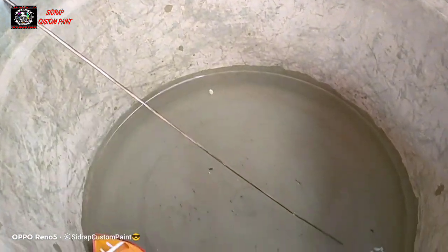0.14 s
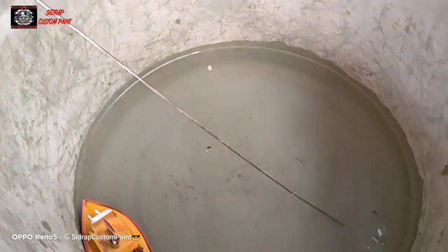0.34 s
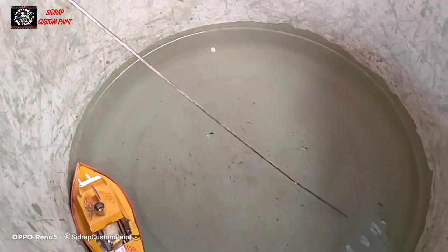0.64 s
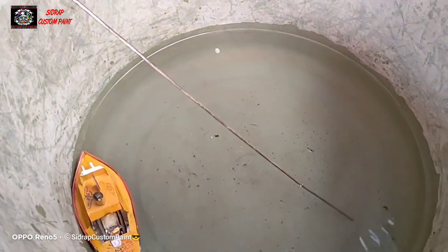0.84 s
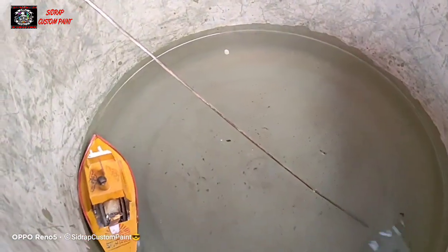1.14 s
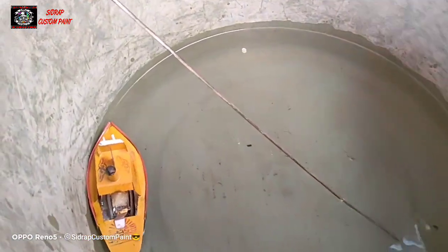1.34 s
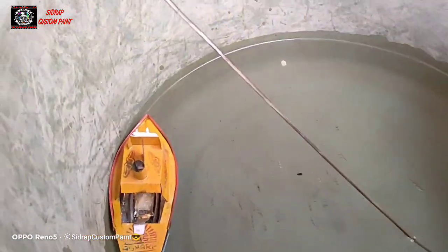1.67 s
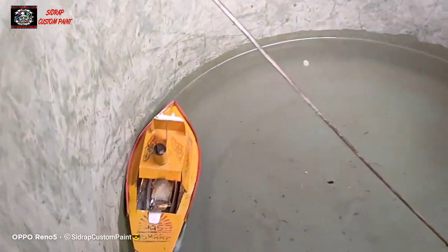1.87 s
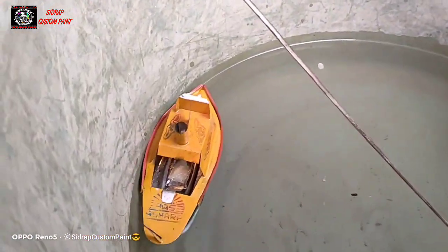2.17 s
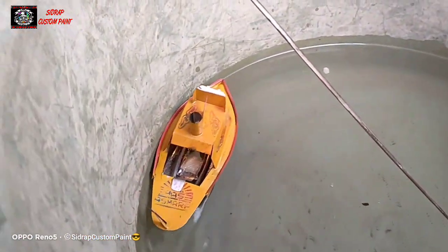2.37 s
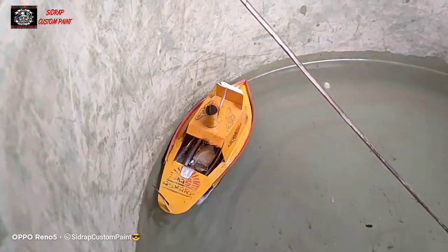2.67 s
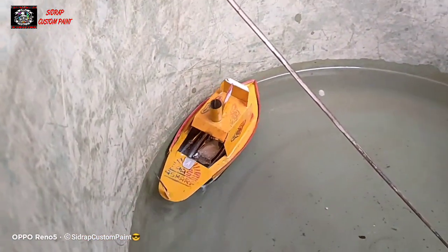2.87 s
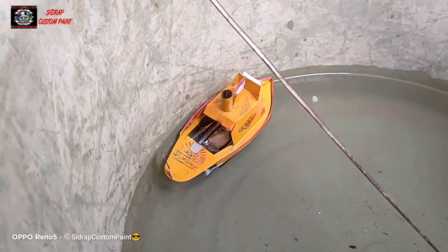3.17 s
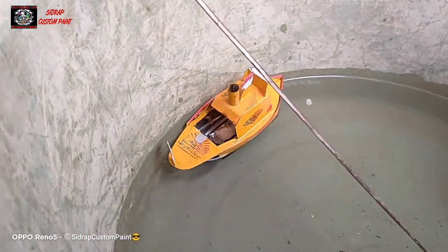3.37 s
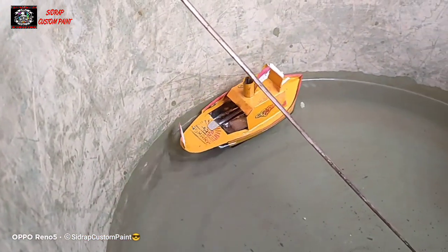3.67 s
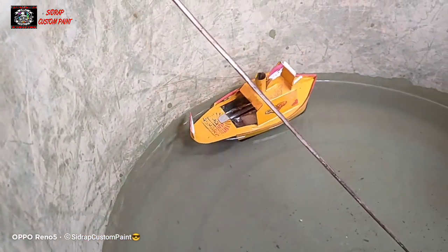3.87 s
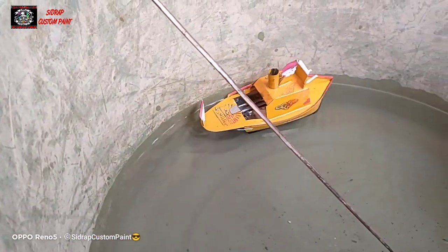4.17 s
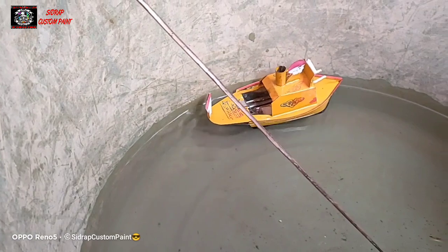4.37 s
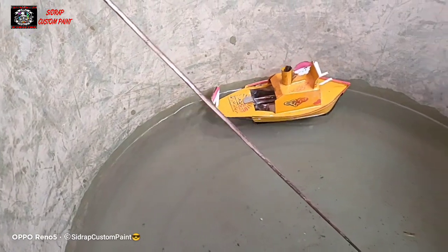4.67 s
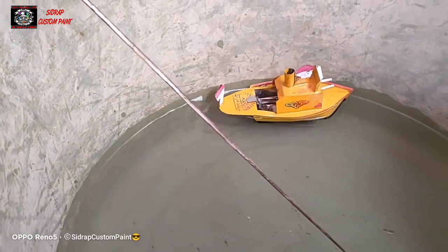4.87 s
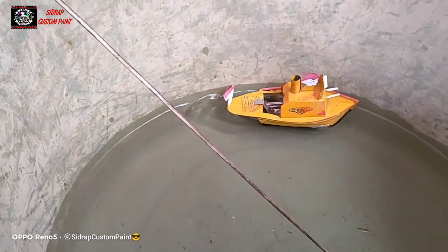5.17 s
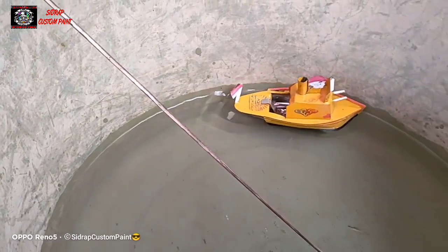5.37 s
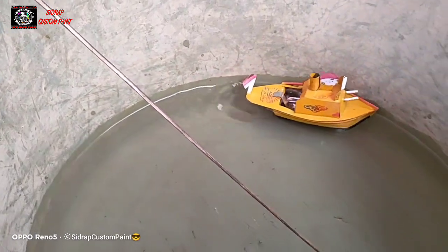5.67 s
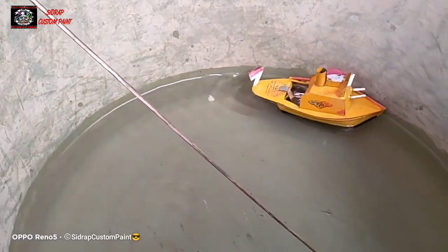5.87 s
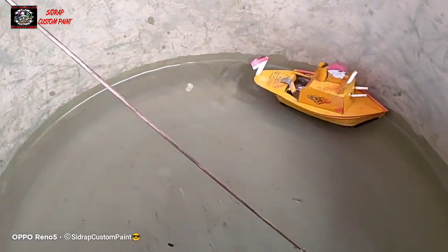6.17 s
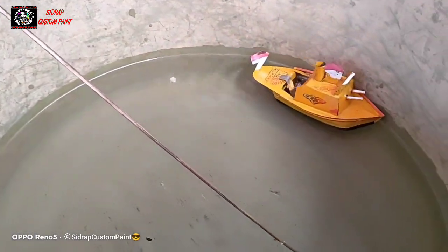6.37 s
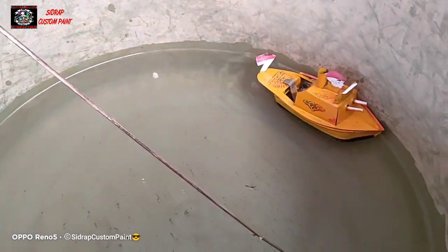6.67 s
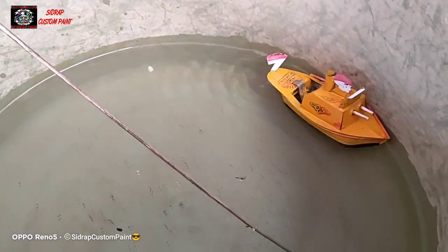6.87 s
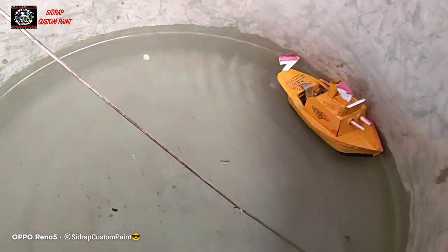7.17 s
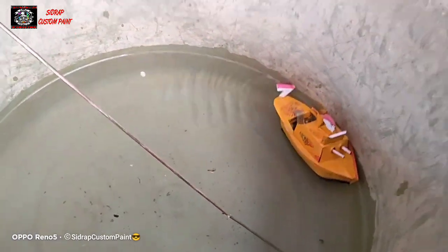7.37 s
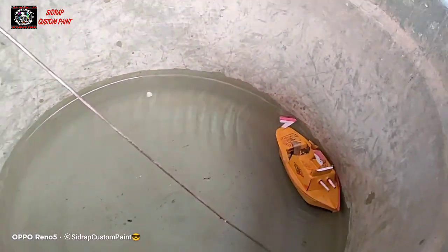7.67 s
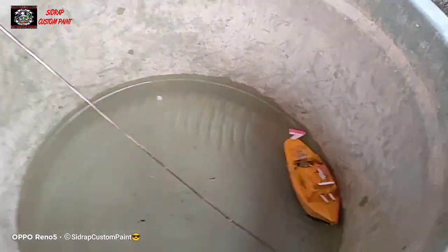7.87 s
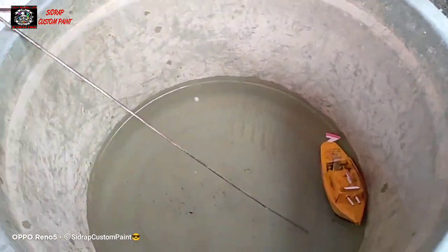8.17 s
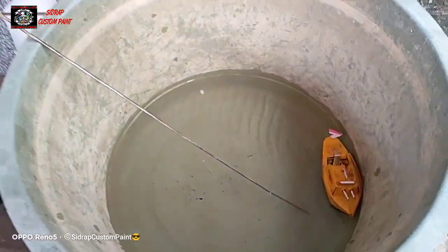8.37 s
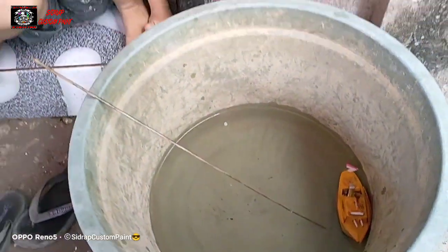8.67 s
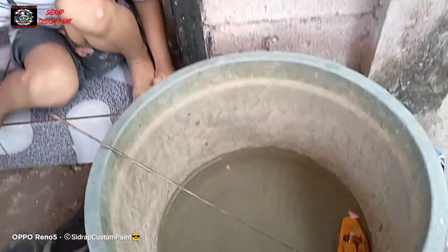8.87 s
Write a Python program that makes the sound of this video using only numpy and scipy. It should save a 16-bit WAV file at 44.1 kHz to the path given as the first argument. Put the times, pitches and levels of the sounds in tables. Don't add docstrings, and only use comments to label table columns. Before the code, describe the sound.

A small tin steam toy boat putters rapidly in a plastic tub, spaced metallic pops tightening into a quick, even clatter, close up outdoors.

```python
import sys
import numpy as np
from scipy import signal
from scipy.fft import rfft, irfft, next_fast_len
from scipy.io import wavfile
from scipy.ndimage import uniform_filter1d, minimum_filter1d, map_coordinates

SR = 44100
rng = np.random.default_rng(int(sys.argv[2]) if len(sys.argv) > 2 else 0)


def bounce(signal):
    frames = np.transpose(np.atleast_2d(signal))
    limited = np.clip(frames, -1, 1)
    pcm = np.round(limited * 32767).astype(np.int16)
    wavfile.write(sys.argv[1], SR, pcm)


def linear_from_db(decibels):
    return 10 ** (np.asarray(decibels, float) / 20)


N = 398523
RING = SR // 16


def unit(x):
    return x / np.sqrt(np.mean(x ** 2) + 1e-20)


def along(points, hz):
    f, v = np.transpose(points)
    return np.interp(np.log(hz + 1), np.log(f + 1), v)


def curves(rows, s=None, outside=None):
    at, *cols = np.transpose(rows)
    s = np.arange(N) / SR if s is None else s
    return [np.interp(s, at, c, outside, outside) for c in cols]


def drift(rate, s, count):
    knots = rng.standard_normal((count, int(N * rate / SR) + 4))
    return np.array([map_coordinates(k, [s * rate + 1]) for k in knots])


def noise(gain, alike, patchy_db=0):
    z = signal.stft(rng.standard_normal((2, N)), nperseg=512)[2]
    field = uniform_filter1d(rng.standard_normal(z.shape[1:]), size=6, axis=0)
    field = uniform_filter1d(field, size=12, axis=1)
    pair = signal.istft(z * linear_from_db(patchy_db * unit(field)), nperseg=512)[1][:, :N]
    m = next_fast_len(N + 8192)
    a, b = irfft(rfft(pair, m) * gain(np.fft.rfftfreq(m, 1 / SR)), m)[:, :N]
    turn = np.arccos(np.clip(alike, -1, 1)) / 2
    middle, difference = np.cos(turn) * a, np.sin(turn) * b
    return unit(np.array([middle + difference, middle - difference]))


def resonance(hz, centre_hz, width_hz):
    return np.abs(hz * width_hz / (centre_hz ** 2 - hz ** 2 + 1j * hz * width_hz))


def ring(modes, t, shift, level_db, phase, attack, damping):
    hz, db, t60 = (c[:, None] for c in np.transpose(modes))
    t = np.maximum(t, 0)
    fade = linear_from_db(db + level_db[..., None] - 60 * damping * t[:, None] / t60)
    waves = (fade * np.sin(2 * np.pi * hz * shift * t[:, None] + phase[..., None])).sum(1)
    return waves * (1 - np.exp(-(t / attack) ** 2)) * (1 + 0.49 * np.exp(-t / 0.0052))


# time in seconds, wind level in dB, air level in dB.
STREET_LEVELS = [
    (0.0, -68, -47),
    (0.88, -65, -53),
    (3.14, -54, -55),
    (3.82, -64, -57),
    (7.53, -69, -56.5),
    (9.04, -66, -51),
]
# time in seconds, firing rate in Hz, low orders in dB, upper orders in dB.
ENGINE_HUM = [(0, 30.05, -73, -77), (.4, 30.78, -69, -68), (1.5, 31.98, -60, -70.5),
              (1.9, 32.24, -52.5, -65.5), (2.4, 32.9, -54, -69), (2.8, 33.45, -60, -66),
              (3.1, 33.68, -50, -65), (3.4, 33.87, -53, -67.5), (3.6, 33.95, -62, -69),
              (4.6, 34.1, -70, -71.5), (5.2, 33.55, -67, -71), (5.6, 30.96, -80, -77.5)]
# multiple of the firing rate, level in dB.
ENGINE_ORDERS = [(4, 1), (5, 2), (6, -7), (7, -8), (8, -9)]
# frequency in Hz, level in dB per Hz.
WIND_SPECTRUM = [(15, -4), (33, 10), (55, 9), (120, 0.5), (250, -53)]
# frequency in Hz, level in dB per Hz.
AIR_SPECTRUM = [(35, -33), (60, -8.5), (176, -3), (593, -7), (666, -9.5), (1470, -12), (2470, -3.5),
                (2840, -7.5), (4750, -10.5), (5210, -10.5), (7570, -21.5), (13900, -27), (16000, -35)]


def street():
    wind_db, air_db = curves(STREET_LEVELS)
    firing_hz = curves(ENGINE_HUM)[0]
    _, low_db, upper_db = curves(list(ENGINE_HUM) + [(8.7, 0, -100, -100)])
    turn = 2 * np.pi * np.cumsum(firing_hz) / SR
    sway = drift(5, np.arange(N) / SR, count=len(ENGINE_ORDERS) + 2)
    low = np.sin(2 * turn + 1.1 * sway[0]) + 0.71 * np.sin(turn + 0.38 * sway[1])
    hum = linear_from_db(low_db + 4.5) * low
    for (multiple, db), w in zip(ENGINE_ORDERS, sway[2:]):
        hum += linear_from_db(upper_db + 10 + db + 2 * w) * np.sin(multiple * turn + 1.05 * w)
    wind = noise(lambda hz: linear_from_db(along(WIND_SPECTRUM, hz)), alike=0.9)
    air = noise(lambda hz: linear_from_db(along(AIR_SPECTRUM, hz)), alike=0.49, patchy_db=3.5)
    return linear_from_db(wind_db + 3.5) * wind + hum * linear_from_db([[-1], [1]]) + linear_from_db(air_db + 5.5) * air


# start in seconds, length in seconds, centre in Hz, bandwidth in Hz, level in dB.
FAINT_EVENTS = [
    (0.064, 0.039, 5200, 200, -43),
    (1.544, 0.098, 6800, 800, -31.5),
    (1.915, 0.071, 5550, 1490, -26.5),
    (2.327, 0.35, 145, 61, -45.5),
    (6.938, 0.095, 6200, 600, -44),
    (4.488, 0.015, 910, 120, -35.5),
]


def faint():
    t, out = np.arange(N) / SR, 0
    for s, length, hz, width, db in FAINT_EVENTS:
        swell = np.sin(np.pi * np.clip((t - s) / length, 0, 1) ** 0.28)
        out = out + linear_from_db(db) * swell * noise(lambda f: resonance(f, hz, width) ** 2, alike=0.94)
    return out


# time in seconds, level in dB.
SHUFFLE_LEVEL = [
    (8.958, -36),
    (8.968, -20),
    (9.0, -21),
    (9.02, -25.5),
    (9.04, -34),
]
# frequency in Hz, level in dB per Hz.
CLOTH_SPECTRUM = [(120, -59), (200, -39), (569, -30), (1080, -6.5), (1480, -11), (2090, -7), (2860, -19),
                  (4430, -8), (9750, -34.5), (14600, -41), (16000, -61)]


def shuffle():
    level_db, = curves(SHUFFLE_LEVEL, outside=-120)
    lumps = linear_from_db(1.9 * drift(180, np.arange(N) / SR, count=1))
    rub = noise(lambda hz: linear_from_db(along(CLOTH_SPECTRUM, hz)), alike=0.37, patchy_db=3.5)
    return linear_from_db(level_db) * lumps * rub


# time in seconds, level in dB, squeak frequency in Hz.
SCRAPE_PATH = [
    (4.265, -45, 5730),
    (4.29, -36, 5700),
    (4.32, -33, 6060),
    (4.335, -34, 6680),
    (4.355, -40, 6800),
    (4.37, -41, 6950),
]
# frequency in Hz, level in dB per Hz.
WIRE_SPECTRUM = [(1180, -56), (2000, -26), (2320, -28), (2890, -11), (5140, -14), (5760, -5), (8520, -35),
                 (11700, -28), (14000, -48)]


def scrape():
    level_db, _ = curves(SCRAPE_PATH, outside=-120)
    squeak_hz = curves(SCRAPE_PATH)[1]
    t = np.arange(N) / SR
    grit = noise(lambda hz: linear_from_db(along(WIRE_SPECTRUM, hz)), alike=0.14, patchy_db=-2.5)
    shake = drift(150, t, count=3)
    squeal = 0.5 * np.sin(2 * np.pi * 2900 * t + 1.9 * shake[0])
    octave = 0.3 * np.sin(2 * np.pi * 5780 * t + .9 * shake[1])
    squeak = 0.61 * np.sin(2 * np.pi * np.cumsum(squeak_hz) / SR + 0.86 * shake[2])
    return linear_from_db(level_db + 3.0) * (grit + squeal + octave + squeak)


# frequency in Hz, decay time t60 in seconds.
PORCH_DECAY = [(400, 0.25), (1500, 0.32), (4500, 0.34), (9000, 0.42), (15000, 0.068)]


def porch(x):
    out, step = np.zeros((2, N + SR)), SR // 5
    for start in range(0, N, step):
        hz, t, z = signal.stft(rng.standard_normal((2, SR // 3)), SR, nperseg=256)
        decay = linear_from_db(-60 * t / along(PORCH_DECAY, hz)[:, None])
        tail = signal.istft(z * decay, SR, nperseg=256)[1]
        wet = signal.fftconvolve(x[:, start:start + step], tail / np.linalg.norm(tail[0]), axes=1)
        out[:, start + 200:][:, :wet.shape[1]] += wet
    return out[:, :N]


# first snap in seconds, snap level in dB, tin ring
# in dB, letters (one a steam cycle: x snaps; e, t, l tick early, on time, late; . stays silent).
RHYTHM_BARS = [(0.2577, -4, -1, "xe..xl.xt.."), (0.9335, -7, 3.5, "xl..xt."), (1.3617, -10.5, 5, "xt.xl.."),
               (1.7887, -6, 3, "xl"), (1.914, -7, 1.5, "xtxt"), (2.1573, -8, 3, "xxlxexl"),
               (2.588, -5, -3.5, "xx.."), (2.8312, -4, -4, "xext."), (3.1365, -3.5, -2.5, "xtxtxx."),
               (3.567, -7, -1.5, "xexx."), (3.8745, -6.5, -3.5, "xexx.xx."),
               (4.3636, -8.5, -2, "xx.xlxxl."), (4.9149, -6.5, -2, "xx.xe"), (5.2214, -3, -4, "xt"),
               (5.3462, -3.2, -4.5, "xexl"), (5.59, -7, -3, "xxxlxe"), (5.9609, -8.5, -1.8, "xxxx."),
               (6.2705, -3.5, -3.5, "xxxx."), (6.5778, -9, -3.5, "xx."), (6.7633, -10.5, -1.5, "xxxl"),
               (7.0109, -10, -0.5, "xx."), (7.2016, -9.5, -0.6, "xexlxe"), (7.5718, -7.5, -1.5, "xtxtxt"),
               (7.9465, -8.5, 1.2, "xlxl"), (8.1959, -7.5, -0.5, "xx."), (8.386, -8.5, 0.3, "xlxlxt"),
               (8.7549, -4, -1, "xtx.")]
# time in seconds, rattle in dB under the snap.
RATTLE_LEVEL = [(0.3, -6), (1.5, -3), (1.9, -19), (2.4, -19), (2.7, -10), (3.2, -15.5), (3.9, -14.5),
                (5.6, -15.5), (6, -9.5), (7.3, -7), (8.3, -8), (8.8, -10)]
CYCLE_MS, HURRY_MS, REFILL_MS = 61.5, 1.055, 63.3
BACK_MS, BACK_GROWS_MS_PER_S, SPENT_MS = 16.2, 0.1448, -1.837
OVERDUE = .8
SECOND_DB, SECOND_TIN_DB, SECOND_RATTLE_DB = 0.26, -2, -18


def strokes():
    times, flags, rests, late_ms = [], [], [], [0]
    for bar, following in zip(RHYTHM_BARS, list(RHYTHM_BARS[1:]) + [None]):
        after = bar[-1].split("x")[1:]
        gaps_ms = [CYCLE_MS * (len(r) + 1) - HURRY_MS if r else REFILL_MS for r in after]
        gaps = np.cumsum([0] + gaps_ms) / 1000
        stretch = (following[0] - bar[0]) / gaps[-1] if following else 1
        times += list(bar[0] + gaps[:-1] * stretch)
        late_ms += list(np.diff(gaps) * (stretch - 1) * 1000)
        run = 0
        for r in after:
            flags.append((run % 2, run > 0 and r > ""))
            run = 0 if r else run + 1
        rests += after
    s, (second, spent) = np.array(times), np.transpose(flags)
    db, tin_db = curves([bar[:-1] for bar in RHYTHM_BARS], s)
    rattle_db, = curves(RATTLE_LEVEL, s)
    back_ms = BACK_MS + BACK_GROWS_MS_PER_S * s + SPENT_MS * spent
    back_ms = back_ms - OVERDUE * np.clip(late_ms[:-1], 0, None)
    db, tin_db = db + SECOND_DB * second, tin_db + SECOND_TIN_DB * second
    return np.transpose([s, db, back_ms, tin_db, rattle_db + SECOND_RATTLE_DB * second]), rests


TICK_LEVEL = {"e": -14.5, "t": -16.5, "l": -15.5}
TICK_DELAY = {"e": 68.3, "t": 72.3, "l": 77.5}
# time in seconds, level in dB, tin ring in dB.
STRAY_TICKS = [
    (0.632, -29.5, -3),
    (2.7222, -27, -2),
    (3.0803, -25, -1.2),
    (3.366, -33, 5),
    (6.6284, -23, -7),
    (7.153, -26.5, -3),
]
TICK_TIN_DB, AFTER_DB, AFTER_TIN_DB, AFTER_MS = 2, -8, -2.5, 24.5


def ticks():
    rows = list(STRAY_TICKS)
    for (s, db, _, tin_db, _), rest in zip(*strokes()):
        if rest[:1] in TICK_LEVEL:
            ms, tick_db = TICK_DELAY[rest[0]], db + TICK_LEVEL[rest[0]]
            chance = rng.standard_normal(4)
            rows.append((s + ms / 1000, tick_db + 1.45 * chance[0], tin_db + TICK_TIN_DB + 2 * chance[1]))
            trail = s + (ms + AFTER_MS + 1.5 * chance[2]) / 1000
            rows.append((trail, tick_db + AFTER_DB + 2 * chance[3], tin_db + AFTER_TIN_DB))
    return rows


def blows():
    rows = []
    for s, db, tin_db in ticks():
        rows.append((s, db + 0.14, db + tin_db + 0.5, 1, 0.887 + rng.normal(0, 0.054), 1.7))
    for s, db, back_ms, tin_db, rattle_db in strokes()[0]:
        back = s + back_ms / 1000
        rows.append((s, db, db + tin_db, 1, 1, 1))
        rows.append((back, db - .6, db + tin_db + 0.12, -1, 1.012, 1.15))
        rows.append((back + 0.0125, db + rattle_db - 10, db + rattle_db + 2, 1, .93, 1.5))
    return np.array(rows)


# time in seconds, drum left-right in dB, upper drum in dB, tub air in dB.
BOAT_PLACE = [(0.2, 2, 1, -5.5), (0.75, -1, -4, -4.5), (1.3, 4.5, 3, -5.5), (2.1, -0.5, -2, -2),
              (2.949, -0.8, -6.5, -1.5), (4.05, 2.2, -4.5, 3), (4.6, 2, -1.7, 4), (5.15, -2, -5, 2.5),
              (5.7, -2.5, -9.5, 4.5), (6.4, 3, -4.5, -0.2), (7.35, 5, -3.5, -1), (8.45, 4, -2.5, -5.5),
              (9.0, 4.5, -6, -3)]
# frequency in Hz, level in dB, t60 in seconds.
TUB_AIR_MODES = [(349, -3, 0.025), (600, 0.5, 0.042)]


def tub_air(hits):
    out, t = np.zeros(N + SR), np.arange(RING) / SR
    for (s, db, _, direction, _, _), tub_db in zip(hits, curves(BOAT_PLACE, hits[:, 0])[-1]):
        level_db = rng.normal(0, 2.0, (1, 2))
        thump = ring(TUB_AIR_MODES, t[None], 0.98, level_db, np.zeros((1, 2)), 0.0015, 0.86)[0]
        out[round(s * SR):][:RING] += direction * linear_from_db(db + tub_db - 31.5) * thump
    for s, db, back_ms, _, rattle_db in strokes()[0]:
        tub_db = curves(BOAT_PLACE, s)[-1]
        bubble = np.sin(2 * np.pi * 445 * np.exp(rng.normal(0, 0.032)) * t)
        bubble = bubble * (t / 0.0084) * np.exp(1 - t / 0.0074)
        start = round((s + back_ms / 1000 + .012) * SR)
        out[start:][:RING] += linear_from_db(db + 0.79 * rattle_db + 1.9 * tub_db - 29) * bubble
    return out[:N]


# frequency in Hz, level in dB, t60 in seconds.
DRUM_MODES = [(803, 4, 0.0049), (1248, -10.5, 0.026), (1486, -7, 0.029), (1408, 4.5, 0.018),
              (1590, 12, 0.0082), (1745, 1.5, 0.042), (1851, 2.5, 0.037), (2170, 4, 0.012),
              (2872, -14, 0.066)]
# frequency in Hz, level in dB, t60 in seconds.
TIN_MODES = [(4070, -33.5, 0.0063), (4098, -3, 0.03), (4320, -19, 0.025), (4285, -5.5, 0.026),
             (4348, -4, 0.065), (5200, -10.5, 0.032), (5733, -11.5, 0.058), (6230, -28.5, 0.1),
             (6836, -28.5, 0.19), (7470, -20.5, 0.05)]
# frequency in Hz, level in dB, t60 in seconds.
KNOCK_MODES = [(1818, 8.5, 0.0042), (4340, 1, 0.012), (5700, -6.5, 0.0091)]
# delay in ms, level in dB.
WALL_ECHOES = [(1.3, -10.5), (2.4, -11.5), (3.7, -11.5), (5.4, -20.5), (7.6, -16), (10.5, -21.5)]
# frequency in Hz, level in dB per Hz.
CRACK_SPECTRUM = [(600, -77), (1500, 19.5), (3000, -2), (4500, 7.5), (7500, -29.5), (8000, -10.5),
                  (8500, -6), (9700, -29), (11500, -5.5), (12800, -60), (14200, -33), (15500, -50)]
# frequency in Hz, level in dB per Hz.
SIZZLE_SPECTRUM = [(2000, 7), (3200, 5.5), (5000, -46.5), (7400, -5), (8200, -2), (11500, -5.5),
                   (14500, -3), (16000, -40)]
# time in seconds, lead in ms.
LEFT_LEAD = [(0.4, .21), (1.6, .25), (2.7, .26), (3.8, .305), (4.3, .33), (4.9, .335), (5.9, .4),
             (6.35, .45), (6.7, .41), (7.1, .345), (7.9, .335), (8.7, .35)]
DRUM_LEAD = 0.59
TIN_SIDE_DB, TIN_FOLLOWS, TIN_TURNS_DB_PER_S = -5.5, 0.63, 0.41


def boat(hits):
    s = hits[:, 0]
    lead_ms, = curves(LEFT_LEAD, s)
    drum_pan, upper_db, tub_db = curves(BOAT_PLACE, s)
    tin_pan = TIN_SIDE_DB + TIN_FOLLOWS * drum_pan + TIN_TURNS_DB_PER_S * s
    split, modes = len(DRUM_MODES), len(DRUM_MODES) + len(TIN_MODES)

    def both(rate, count):
        return drift(rate, s, count).T[:, None]

    def each(rate, count):
        return drift(rate, s, 2 * count).T.reshape((len(s), 2, -1))

    strength = 1.2 * both(2.2, modes) + .8 * each(2.2, modes)
    strength += .7 * rng.standard_normal((len(s), 1, modes))
    phase = .3 * both(.9, modes) + .2 * each(.9, modes)
    phase += .15 * rng.standard_normal((len(s), 1, modes))
    tune = 1 + .007 * drift(1.5, s, modes).T + .003 * rng.standard_normal((len(s), modes))
    echo_ms, echo_db = np.transpose(WALL_ECHOES)
    echoes = echo_ms * np.exp(.11 * both(.9, len(echo_ms)) + .02 * each(.9, len(echo_ms)))
    puffs = noise(lambda hz: linear_from_db(along(CRACK_SPECTRUM, hz)), alike=0.088)
    steam = noise(lambda hz: linear_from_db(along(SIZZLE_SPECTRUM, hz)), alike=0.11, patchy_db=2.0)
    buzz = 1 + 0.77 * drift(500, np.arange(N) / SR, count=1)
    drum_hz = np.transpose(DRUM_MODES)[0]
    out, side = np.zeros((2, N + SR)), np.array([[.5], [-.5]])
    for i, (at, drum_db, tin_db, direction, pitch, damping) in enumerate(hits):
        start = round(at * SR) - 40
        span = slice(start, start + RING)
        t = (np.arange(RING) + start) / SR - at + side * lead_ms[i] / 1000
        level, angle, shift = strength[i], phase[i], tune[i][:, None]
        colour = side * drum_pan[i] + upper_db[i] * (drum_hz > 1650) + .8 * (tub_db[i] + 3) * (drum_hz < 1320)
        drum_t = t - side * (1 - DRUM_LEAD) * lead_ms[i] / 1000
        drum = ring(DRUM_MODES, drum_t, pitch * shift[:split], level[:, :split] + colour,
                    angle[:, :split], 0.00041, damping)
        tin = ring(TIN_MODES, t - .0003, pitch ** .4 * shift[split:], level[:, split:] + side * tin_pan[i],
                   2 * angle[:, split:], 0.00021, damping)
        since = np.maximum(t.mean(0), 0)
        knock = sum(linear_from_db(db - 60 * since / t60) * np.sin(2 * np.pi * hz * pitch * since)
                    for hz, db, t60 in KNOCK_MODES)
        drum += knock * np.tanh(since / 0.00022)
        fade = linear_from_db(-60 * np.abs(t) / 0.031) * np.clip(t / 0.00098, 0, 1)
        crack = fade * linear_from_db(side * drum_pan[i]) * puffs[:, span]
        sizzle = linear_from_db(-60 * np.abs(t) / 0.13) * np.clip(t / 0.0083, 0, 1) * steam[:, span]
        tin = tin * buzz[:, span] + 0.11 * sizzle
        direct = direction * (linear_from_db(drum_db - 8) * (drum + 0.67 * crack) + linear_from_db(tin_db - 7.0) * tin)
        out[:, span] += direct
        for ear in (0, 1):
            for ms, db in zip(echoes[i, ear], echo_db):
                out[ear, start + round(ms * SR / 1000):][:RING] += linear_from_db(db) * direct[ear]
    return signal.sosfilt(signal.butter(8, 880, "high", fs=SR, output="sos"), out[:, :N])


# time in seconds, distance gained from 0 to 1.
PHONE_AWAY = [
    (0, 0),
    (6.5, 0),
    (7.9, 0.5),
    (8.4, 0.32),
    (9.04, 0.35),
]


def scene():
    hits = blows()
    engine = boat(hits) + tub_air(hits)
    away, = curves(PHONE_AWAY)
    near = linear_from_db(-1.6 * away) * engine
    far = linear_from_db(-16 + 4.5 * away) * porch(engine)
    return near + far + street() + scrape() + shuffle() + faint()


def roll_off(x):
    return signal.sosfilt(signal.butter(12, 16460, fs=SR, output="sos"), x)


def record(dry):
    need = np.minimum(1, .9 / (np.abs(dry).max(0) + 1e-9))
    held = uniform_filter1d(minimum_filter1d(need, size=161), size=81)
    soft = signal.sosfilt(signal.butter(8, 15200, fs=SR, output="sos"), dry * held)
    return roll_off(soft)


dry = scene()
out = record(dry)
bounce(out)
```